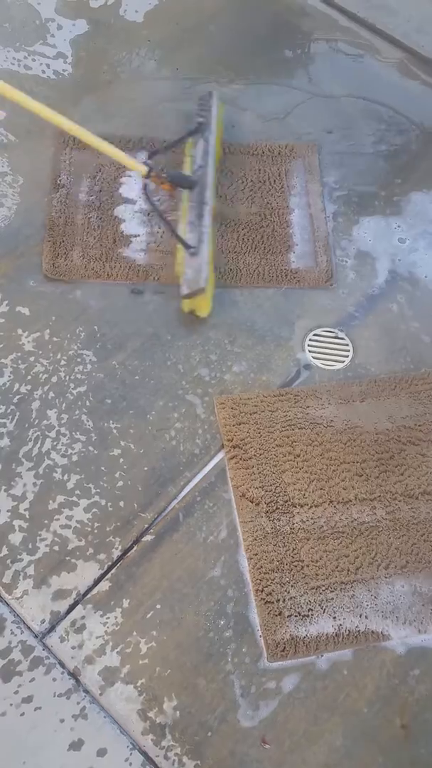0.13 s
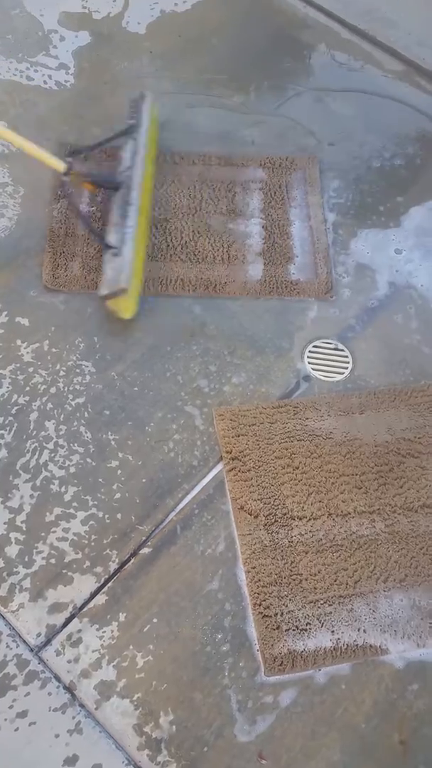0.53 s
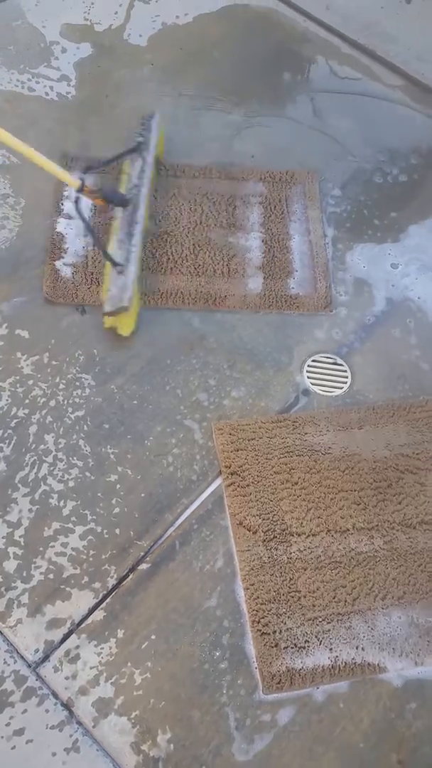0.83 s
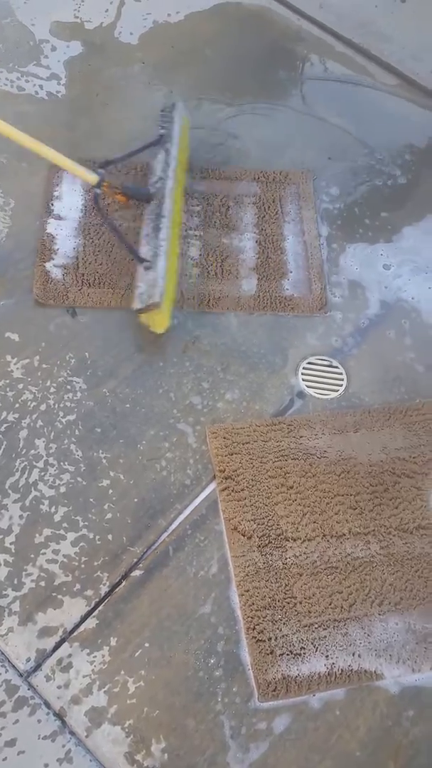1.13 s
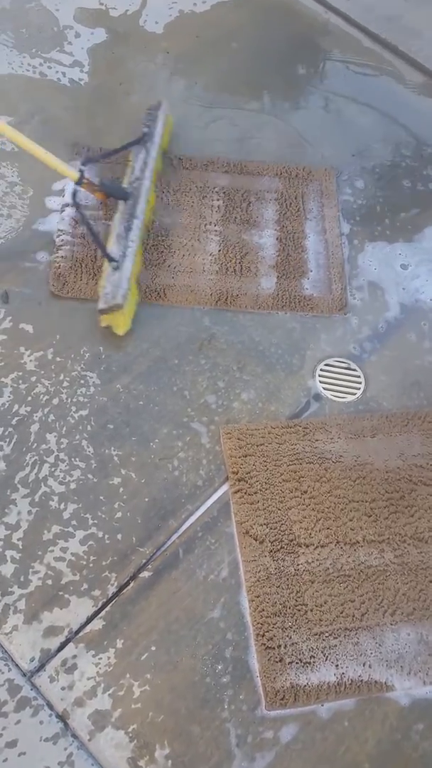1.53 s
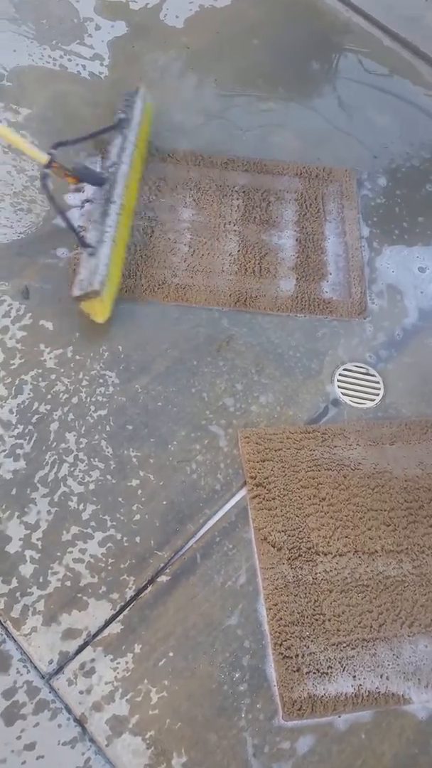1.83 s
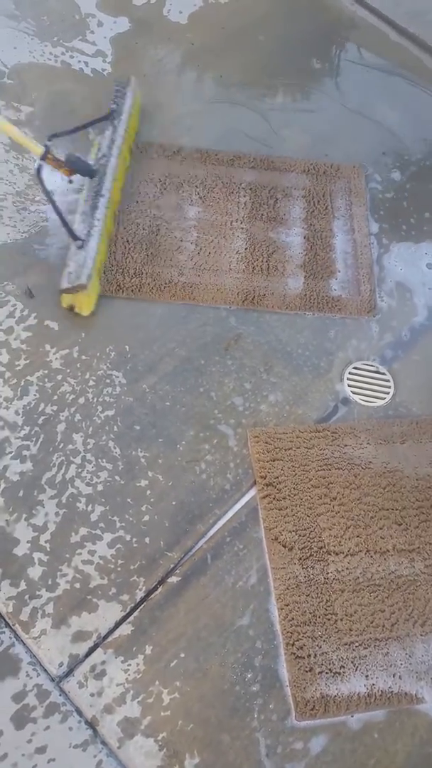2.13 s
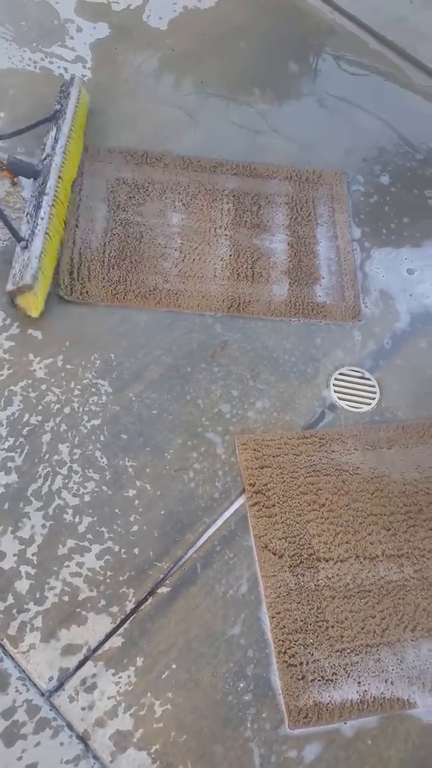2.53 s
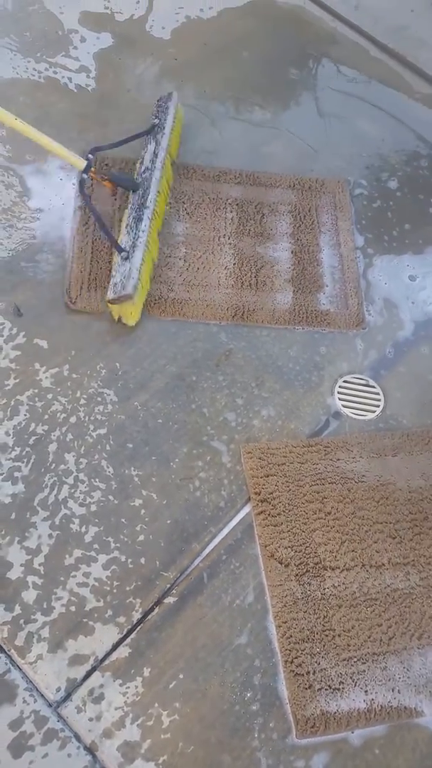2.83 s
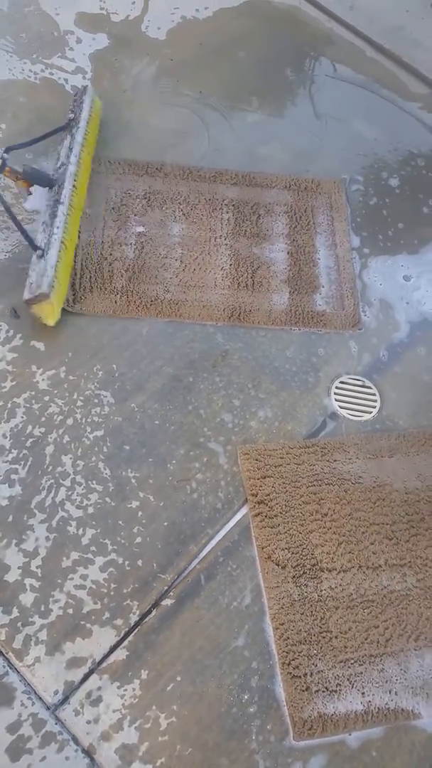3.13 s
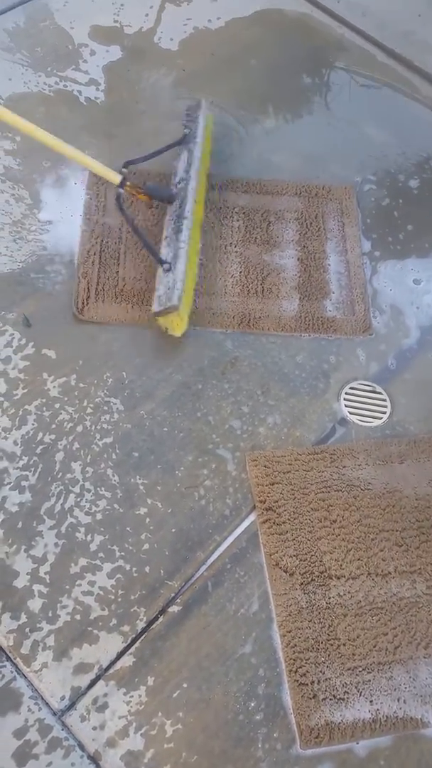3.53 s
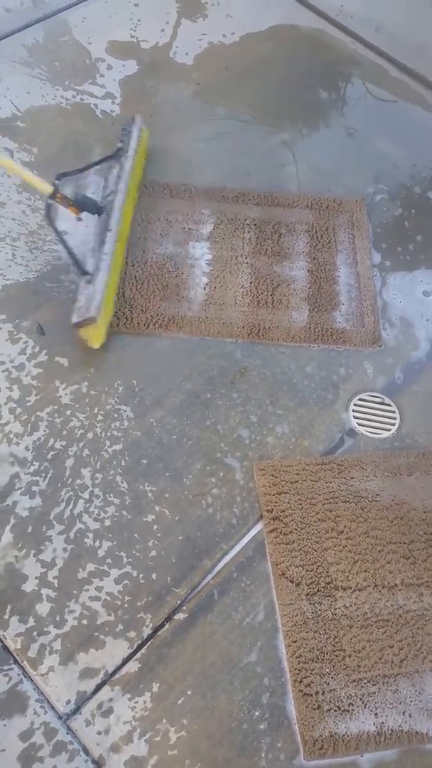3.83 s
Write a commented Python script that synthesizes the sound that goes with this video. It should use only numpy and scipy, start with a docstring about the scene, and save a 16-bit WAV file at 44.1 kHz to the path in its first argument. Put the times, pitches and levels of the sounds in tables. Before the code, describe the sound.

Stiff broom bristles scrubbing a soaked rug outdoors, crisp rhythmic scratches with small watery squelches.

```python
"""After a silent lead, a stiff broom fades in, scrubbing a wet soapy rug on concrete back and forth.
The scrub is dense random impulses, one for each bristle flick, filtered by pile and port.
Suds fizz as fine pops, water squelches as ringing bubbles, and a faint short whistle sounds once.
Far traffic is shaped noise, two far engines are harmonic series, and breeze bumps are brief low swings.
All reach a phone below with two unlike microphone ports."""
import sys
import numpy as np
from scipy import signal
from scipy.fft import rfft, irfft
from scipy.io import wavfile
from scipy.ndimage import uniform_filter1d

SR = 44100
rng = np.random.default_rng(int(sys.argv[2]) if len(sys.argv) > 2 else 0)


def field_ratio(decibels):
    """Amplitude ratio for a level in dB (20 dB per decade); scalars and array-likes work."""
    return 10 ** (np.asarray(decibels, dtype=float) / 20)


def generate_wav(sig):
    """Save sig (samples, or channels by samples) to the path in sys.argv[1] as 16-bit PCM at SR."""
    pcm = np.round(np.clip(np.atleast_2d(sig).T, -1, 1) * 32767).astype(np.int16)
    wavfile.write(sys.argv[1], SR, pcm)


N = 176400  # samples: 4 s


def evened(x):
    """Normalization: scales the mean power to 1."""
    return x / np.sqrt(np.mean(x ** 2) + 1e-20)


def read(points, hz):
    """Spectral envelope: interpolates a table along a logarithmic frequency axis, as a column."""
    f, value = np.transpose(points)
    return np.interp(np.log(hz + 1), np.log(f + 1), value)[:, None]


def slow(samples):
    """Low-pass random modulation: twice-averaged noise of rms 1."""
    wander = uniform_filter1d(rng.standard_normal(N), int(samples))
    return evened(uniform_filter1d(wander, int(samples)))


def clicks(per_s, spread_db):
    """Shot noise: two independent streams of random impulses, a few of them large, with rms 1."""
    chance = rng.random((2, N))
    size = rng.exponential(1, (2, N))
    sign = rng.standard_normal((2, N))
    soft = np.clip((per_s / SR - chance) * 50, 0, 1)  # softened threshold
    return evened(soft * sign * field_ratio(spread_db * np.minimum(size, 3)))


def ports(pair, left, right, same, lead, shape_db=0, size=512):
    """Partial coherence: the left port hears part of the right's stream, shifted in phase."""
    hz, t, (a, b) = signal.stft(pair, SR, nperseg=size, noverlap=size * 3 // 4)
    c = np.clip(read(same, hz), 0, 1)
    low_cut = hz[:, None] ** 2 / (hz[:, None] ** 2 + 250 ** 2)
    shape = low_cut * field_ratio(shape_db(hz, t) if callable(shape_db) else shape_db)
    left_stream = c * a * np.exp(1j * lead(hz)) + np.sqrt(1 - c ** 2) * b
    z = np.array([field_ratio(read(left, hz)) * left_stream, field_ratio(read(right, hz)) * a])
    gain = np.sqrt(np.mean(field_ratio(read(right, hz)) ** 2))  # both tables count relative to the right port
    return signal.istft(z * shape / gain, SR, nperseg=size, noverlap=size * 3 // 4)[1][:, :N]


def traffic():
    """Filtered noise with partial coherence: a low lumpy rumble, mostly shared by both ports."""
    # far traffic spectrum, relative: f/Hz, level/dB
    rumble = [(12, -54), (20, -14), (80, -1), (107, -2), (129, -5), (216, -9.5), (245, -12), (344, -20),
              (400, -54.5), (520, -87), (880, -120)]
    rumble_db, left_db, same = -46.5, -6.5, 0.69
    a, b = rfft(rng.standard_normal((2, N)))
    hz = np.fft.rfftfreq(N, 1 / SR)
    colour = field_ratio(read(rumble, hz)[:, 0]) * (hz < 450)
    left = field_ratio(left_db) * (same * a + np.sqrt(1 - same ** 2) * b)
    pair = irfft(np.array([left, a]) * colour, N)
    return field_ratio(rumble_db + 1.1 * slow(1850)) * evened(pair)


def engine(curve, orders):
    """Harmonic synthesis: low orders of a far engine follow its integrated frequency and waver in level."""
    left_db, right_db, waver_db = -6, 2.2, 0.8
    s, hz, level_db = np.transpose(curve)
    t = np.arange(N) / SR
    turns = np.cumsum(np.interp(t, s, hz)) / SR
    edge = np.clip(np.minimum(t - s[0] + 0.15, s[-1] + 0.06 - t) / 0.074, 0, 1)
    tone = np.zeros(N)
    for multiple, db in orders:
        phase = 2 * np.pi * (multiple * turns + rng.random())
        tone += field_ratio(db + waver_db * slow(3200)) * np.sin(phase)
    level = np.sqrt(2) * edge * field_ratio(np.interp(t, s, level_db))  # sqrt(2): sine of rms 1
    return level * tone * field_ratio(np.array([[left_db], [right_db]]))


def steady_engine():
    """Periodic source: a far engine whose pitch varies little."""
    # pitch and level before the port gains: t/s, f/Hz, level/dB
    steady_curve = [(.7, 152.4, -51.5), (1.1, 153, -49), (1.8, 155.2, -44.5), (2.47, 160.1, -45.5),
                    (2.9, 165.3, -52.5), (3.3, 163.7, -56)]
    # partials: multiple of f, level/dB
    steady_orders = [(1, 0), (1.5, -15)]
    return engine(steady_curve, steady_orders)


def rising_engine():
    """Frequency glide: a far engine whose partials climb together."""
    # pitch and level before the port gains: t/s, f/Hz, level/dB
    rising_curve = [(1.7, 98, -52), (2.1, 102.8, -52), (2.5, 117, -51.5), (2.85, 126.2, -48),
                    (3.2, 136.6, -46.5), (3.3, 140.6, -56), (3.7, 147.7, -56.5), (4, 160.6, -61)]
    # partials: multiple of f, level/dB
    rising_orders = [(2 / 3, -9), (1, 0), (2, -19)]
    return engine(rising_curve, rising_orders)


def gusts(bumps, cycles):
    """Transient pressure: each gust pushes a diaphragm through a low swing under a Gaussian envelope."""
    t, out = np.arange(N) / SR, np.zeros(N)
    for s, db, hz in bumps:
        u = (t - s) * hz  # cycles from the envelope's peak
        out += field_ratio(db) * np.exp(-.5 * (u / cycles) ** 2) * np.cos(2 * np.pi * u + 2.23)
    return out


def breeze():
    """Local turbulence: a light breeze bumps each port at its own times."""
    # bumps on each port: t/s, envelope peak level/dB, f/Hz
    left_bumps = [(.659, -27, 71.5), (.701, -36, 70), (.931, -26, 80), (.993, -17.5, 109), (1.769, -41, 60),
                  (1.822, -28, 80), (2.225, -28.5, 60), (2.277, -36, 60.4), (2.332, -34, 60),
                  (2.406, -31, 69.55), (2.458, -36, 69.2), (2.586, -28.5, 70.6)]
    right_bumps = [(.646, -37, 70), (.895, -30, 50), (1.531, -31.5, 35), (1.786, -24, 65.4),
                   (1.893, -33, 60.4), (1.948, -32, 50), (2.119, -32.5, 70), (2.31, -40, 59.66),
                   (2.459, -30.5, 70)]
    return np.array([gusts(left_bumps, cycles=0.28), gusts(right_bumps, cycles=0.46)])


def suds():
    """Shot noise of bursting bubbles: dense fine pops, swelling a little."""
    # fizzing suds and yard air at each port, relative: f/Hz, level/dB
    fizz_left = [(300, -61.5), (1000, -69), (2300, -80.5), (4000, -69.5), (5200, -88), (6600, -59.5),
                 (8600, -86.5), (11000, -79), (15500, -75)]
    fizz_right = [(300, -55), (1000, -60), (2300, -65.5), (4000, -58), (5600, -67), (7200, -69),
                  (10000, -60.5), (12500, -67), (15500, -60)]
    # coherence between the ports: f/Hz, likeness (0 to 1)
    fizz_same = [(300, 0.22), (600, 1), (1000, 0.058), (2000, 0.033), (16000, 0.039)]
    pops_per_s, pop_spread_db, fizz_db = 13950, 2, -40
    drive = clicks(pops_per_s, pop_spread_db) * field_ratio(fizz_db + 0.28 * slow(4200))
    return ports(drive, fizz_left, fizz_right, fizz_same, lambda hz: 0)


def whistle():
    """Pure tone: one faint short sine under a flat-topped envelope, mostly at the right port."""
    centre_s, half_length_s, tone_hz, level_db = 3.685, .03, 1740, -55
    t = np.arange(N) / SR - centre_s
    tone = field_ratio(level_db) * np.exp(-(t / half_length_s) ** 4) * np.sin(2 * np.pi * tone_hz * t)
    return tone * np.array([[.4], [1.4]])  # left, right


def squelch():
    """Resonance: sparse bubble clicks ring a broad low band as water is squeezed out of the pile."""
    # presses, level before the port mix: t/s, length/s, level/dB, f/Hz
    presses = [(0.682, 0.25, -44, 1210), (1.033, 0.16, -49.5, 860), (1.381, 0.16, -45.5, 1040),
               (1.696, 0.14, -60, 950), (2.005, 0.037, -45, 810), (2.068, 0.069, -40, 2320),
               (2.267, 0.039, -60, 1400), (2.834, 0.13, -48, 800.6), (3.44, 0.15, -46.5, 819),
               (3.837, 0.031, -44.5, 850)]
    bubbles_per_s, band_width, left_db = 2050, 0.2, -9.5  # width as a fraction of f
    t, out = np.arange(N) / SR, np.zeros((2, N))
    drive = clicks(bubbles_per_s, spread_db=4.5)
    for s, length, db, hz in presses:
        ring = evened(signal.lfilter(*signal.iirpeak(hz, 1 / band_width, SR), drive))
        out += field_ratio(db) * np.exp(-.5 * ((t - s) / (0.36 * length)) ** 4) * ring
    # the left port hears part of the right's stream, 6 samples ahead
    left = field_ratio(left_db) * (.6 * np.roll(out[1], shift=-6) + .8 * out[0])
    return np.array([left, out[1]])


def broom():
    """Impulse excitation and filtering: clumped bristle flicks through a scrape peak that moves with level."""
    # pressure, speed and place, stroke by stroke: t/s, level/dB (before scrub_db), brightness/(dB per
    # octave), left port gain/dB, crispness of the tips/dB (the left port takes crisp_left of it)
    strokes = [
        [(0.5, -44.5, 2, 0, -14), (0.534, -42.5, 0.5, -3, -17), (0.596, -30, 3, -4.5, -10),
         (0.638, -29, 1, -5.5, -6), (0.778, -35.5, 0.5, -1, 2), (0.812, -46, 1, 3, -1),
         (0.886, -45.5, -1.5, -2, 8), (0.906, -40, 0, -2, 6)],
        [(0.911, -33, 0.5, -3, 8), (0.965, -23, 0.5, -2.5, 9), (1.105, -33.5, -1, 0.5, 7.5),
         (1.16, -46, 0, 1, -4), (1.275, -50.5, -0.5, 2, 5), (1.3, -42.5, -2, 0, 9)],
        [(1.32, -34, -0.5, 0, 6), (1.336, -32, -2, -1.5, 10), (1.38, -26, 1.5, -3.5, 12),
         (1.486, -48, -0.5, 1, 5), (1.512, -34.5, 13, -3, 9), (1.558, -49.5, -3.5, -2, 6),
         (1.585, -37.5, 1.5, -1, 7)],
        [(1.6, -33.5, 0, 0, 13), (1.644, -26, 1.5, -2.5, 12), (1.706, -25.5, 0, -3, 8.5),
         (1.844, -48, 1, 2.5, 2), (1.93, -48.5, 3, 4, 2)],
        [(1.95, -41, -3.5, -1, 14), (1.976, -29.5, 0.5, 0.5, -1), (2.047, -26.5, 2.5, -2.5, 12.5),
         (2.088, -29.5, -1.5, -1, 10), (2.125, -46.5, 1.5, 5, -2), (2.175, -42, 2, 0, 6)],
        [(2.195, -33, 2.5, 0, 15), (2.235, -27, -0.5, -2, 8), (2.33, -26.5, 1, 3, 6),
         (2.392, -38.5, -1.5, 0.5, 8), (2.408, -39.5, 2, 1, 4), (2.485, -48, 2.5, 4, 4),
         (2.541, -43, -1.5, -1, 10), (2.575, -29.5, 1.5, 2.5, -2), (2.631, -30, -0.5, -1, 13.5),
         (2.671, -47, -4, -1, -1), (2.695, -42, 1, 0, 12)],
        [(2.73, -35, 0.5, -4, 13), (2.77, -37.5, -0.5, -1, 10), (2.835, -24, 2, -2.5, 7.5),
         (2.925, -34.5, -1, 1, -5)],
        [(2.95, -39.5, 1.5, 2, -7), (3.084, -51.5, -0.5, 3, 7), (3.122, -31.5, -1, 2.5, 2),
         (3.208, -33.5, 3.5, 0.5, 13.5), (3.23, -48, 1, 2, 6), (3.27, -36, 2.5, 0, 6),
         (3.308, -43.5, -1, -1, 7), (3.345, -37.5, 1, 2, 10)],
        [(3.36, -29, -0.5, -2, 8), (3.404, -25, 1.5, -0.5, 10), (3.46, -29.5, -1, 0.5, 0)],
        [(3.56, -37, -0.5, 1, -4), (3.576, -41.5, 1.5, 2, -4), (3.664, -48.5, 1, 5, -2),
         (3.72, -43.5, -2, -1, 15)],
        [(3.75, -33, -0.5, 1, 8), (3.784, -28.5, 1, 2.5, 6), (3.865, -40.5, -1.5, 0, 14)],
        [(3.885, -48, 2, 6, 1), (3.963, -47.5, 1, 2, 8), (4.0, -38.5, -0.5, 3, 6)],
    ]
    # scrubbing as each port colours it, relative: f/Hz, level/dB
    scrub_left = [(300, -58), (600, -80), (1000, -59), (1600, -58.5), (2300, -61), (3000, -59.5),
                  (4000, -56.5), (5000, -50), (5600, -57), (6200, -49), (7200, -54), (8200, -54),
                  (9200, -55.5), (10000, -52), (11000, -54), (12500, -51), (14000, -54), (15500, -47)]
    scrub_right = [(300, -70), (600, -61), (1000, -54.5), (1600, -52), (2300, -51), (3000, -45),
                   (4000, -44), (5000, -45.5), (5600, -50), (6200, -56.5), (7200, -56.5), (8200, -48),
                   (9200, -38.5), (10000, -31), (11000, -36), (12500, -44.5), (14000, -44), (15500, -46.5)]
    # coherence between the ports: f/Hz, likeness (0 to 1)
    scrub_same = [(600, 0.69), (2300, 0.67), (4000, 0.18), (5400, 0.27), (7200, 0.42), (10000, 0.46),
                  (14000, 0.39), (16000, .25)]
    # phase by which the left port leads: f/Hz, phase/rad
    left_lead = [(0, 17), (520, 1.5), (1030, -6), (1380, 1), (2240, 1.5), (4570, 3.5), (5170, 7.5),
                 (7060, 0.27), (7920, 1), (9220, -6.7), (10500, 12.5), (12300, 10.5), (13600, 0.5),
                 (16600, 86)]
    flicks_per_s, flick_spread_db, scrub_db = 26000, .5, 7
    clump_db, clump_samples = .8, 60
    snaps_per_s, snap_db = 400, -17  # single stiff bristles letting go
    scrape_mid_hz, scrape_hz_per_db = 4560, 95  # peak at a level of -23.5 dB, and its slope
    scrape_db, scrape_octaves = 3.5, 0.46
    pivot_hz, crisp_hz, crisp_left, patch_db = 9000, 12000, .4, 2.6

    s, level_db, tilt, lean_db, crisp_db = np.concatenate(strokes).T
    scrape_hz = np.maximum(scrape_mid_hz + scrape_hz_per_db * (level_db + 23.5), 2000)
    now = np.arange(N) / SR
    drive = clicks(flicks_per_s, flick_spread_db) * field_ratio(clump_db * slow(clump_samples))
    drive = drive + field_ratio(snap_db) * clicks(snaps_per_s, flick_spread_db)
    drive *= field_ratio(scrub_db + np.interp(now, s, level_db))

    def colour_db(hz, t):
        """Time-varying filter: tilt, crisp tips, scrape peak and random scratchy patches."""
        f = np.maximum(hz, 500)[:, None]
        brightness = np.log2(np.minimum(f / pivot_hz, 1)) * np.interp(t, s, tilt)
        crisp_share = np.array([[[crisp_left]], [[1]]])
        tips = np.interp(t, s, crisp_db) / (1 + (crisp_hz / f) ** 20) * crisp_share
        octaves_off = np.log2(f / np.interp(t, s, scrape_hz))
        scrape = scrape_db * np.exp(-.5 * (octaves_off / scrape_octaves) ** 2)
        patches = rng.standard_normal((len(t), len(hz))).T
        patches = uniform_filter1d(patches, size=18, axis=1)  # along time
        patches = uniform_filter1d(patches, size=6, axis=0)  # along frequency
        scratch = patch_db * evened(patches) / (1 + (f / pivot_hz) ** 2)  # weaker toward the top
        return brightness + tips + scrape + scratch

    left, right = ports(drive, scrub_left, scrub_right, scrub_same,
                        lambda hz: read(left_lead, hz), colour_db, size=256)
    return np.array([left * field_ratio(np.interp(now, s, lean_db)), right])


def scene():
    """Superposition: the pressures of all sources add at the two ports."""
    background = traffic() + steady_engine() + rising_engine() + breeze()
    return background + suds() + whistle() + squelch() + broom()


def top_cut(x):
    """Nothing passes above the cut-off."""
    return signal.sosfilt(signal.butter(12, 17080, fs=SR, output="sos"), x)


def record(dry):
    """Gating and band limiting: a silent lead, a quick opening, a fade-in and a low-pass filter."""
    start_s, open_s, start_db, fade_end_s, edge_hz = .369, 0.013, -17, 0.6, 15800
    t = np.arange(N) / SR
    opening = np.clip((t - start_s) / open_s, 0, 1)
    fade = opening * field_ratio(np.interp(t, [start_s, fade_end_s], [start_db, 0]))
    low_pass = signal.firwin(511, edge_hz, window=("kaiser", 9), fs=SR)
    mix = signal.oaconvolve(dry * fade, low_pass[None], "same")
    return top_cut(mix)


dry = scene()
out = record(dry)
generate_wav(out)
```